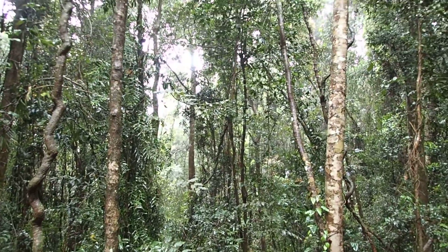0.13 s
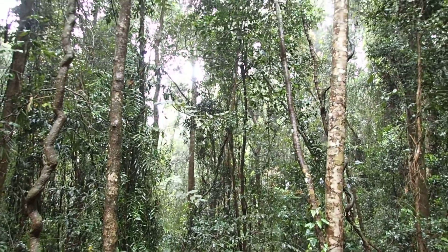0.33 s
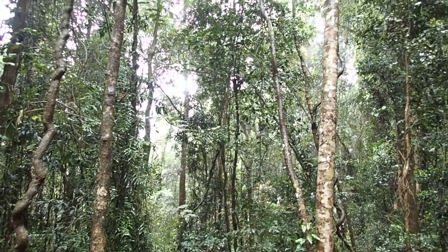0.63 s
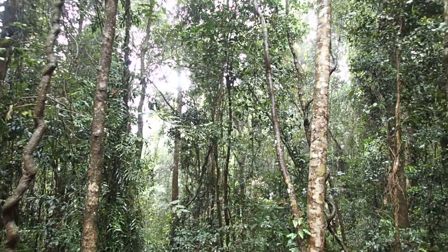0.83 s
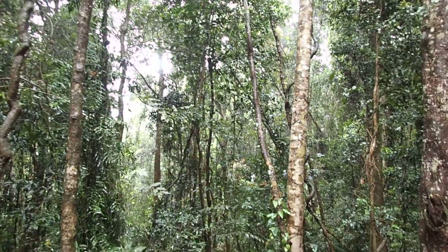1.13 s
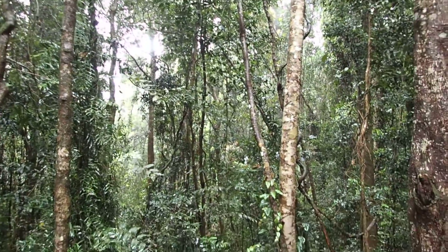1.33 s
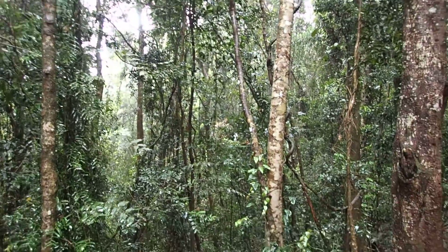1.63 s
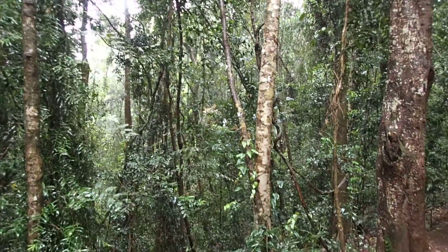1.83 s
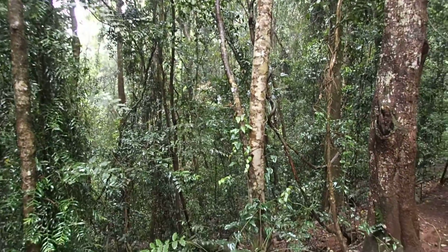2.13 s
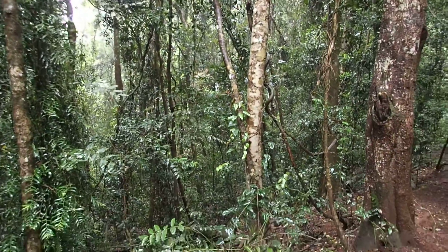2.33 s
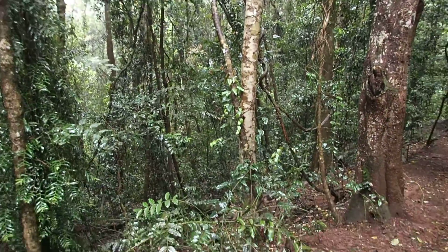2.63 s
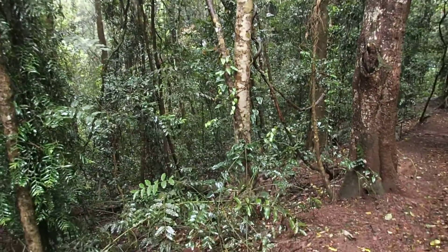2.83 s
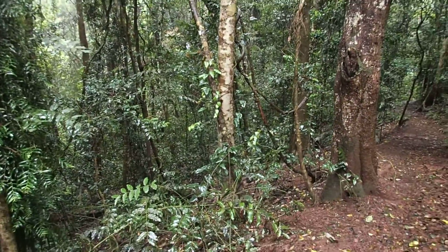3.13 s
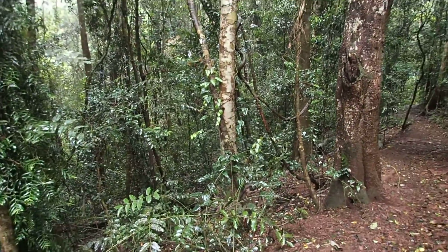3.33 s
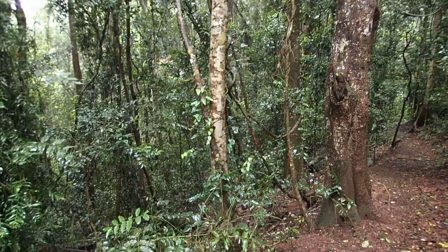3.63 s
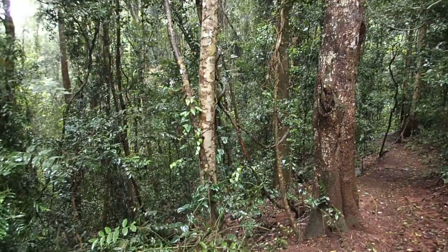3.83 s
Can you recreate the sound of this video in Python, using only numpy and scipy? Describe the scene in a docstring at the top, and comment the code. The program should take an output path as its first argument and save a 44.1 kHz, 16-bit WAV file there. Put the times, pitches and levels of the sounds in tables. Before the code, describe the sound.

A whipbird opens with a quiet, unsteady held whistle, slurs lower at 0.3 s, then whips steeply upward at about 0.6 s, loud and bright, its echo fading among trunks. Shrill cicadas drone throughout, the nearest swelling and bending four times a second, slightly left. Faint forest hush and fine litter crackle continue; twig ticks start near 1 s, a faint chirp comes at 2.3 s, a soft step at 2.8 s.

```python
"""Far cicadas drone over a faint forest hush throughout; the nearest swells and bends about four times a second.
A whipbird opens with a held whistle, slurs a lower note, then whips upward at about 0.6 s.
From about 1 s twigs and leaf litter tick over a fine crackle that runs throughout.
A faint chirp comes at 2.3 s and one soft step at 2.8 s.
Bird and near cicada are gliding tones, the rest is shaped noise; noise echoes stand for the trunks."""
import sys
import numpy as np
from scipy import signal
from scipy.fft import rfft, irfft
from scipy.io import wavfile

SR = 44100
rng = np.random.default_rng(int(sys.argv[2]) if len(sys.argv) > 2 else 0)


def to_wav(sig):
    """Store sig (one row per channel, or 1-D mono) as 16-bit WAV at the path in sys.argv[1].

    Samples outside -1..1 are clipped; the rate is SR.
    """
    pcm = np.clip(np.atleast_2d(sig), -1, 1) * 32767
    pcm = np.round(pcm).astype(np.int16)
    wavfile.write(sys.argv[1], SR, pcm.T)  # frames by channels


N = 176400

# forest hush spectrum, relative: hz, level_db_per_hz
HUSH_SPECTRUM = [(20, -5.5), (60, -0.5), (150, 1.5), (350, -4), (800, -7), (1300, -9), (1600, -9),
                 (1900, -21), (2200, -12.5), (2650, -26), (3200, -8.5), (3420, -35.5), (3620, -9),
                 (3950, -35.5), (5000, -16), (9000, -35.5)]
# even hiss spectrum, relative: hz, level_db_per_hz
HISS_SPECTRUM = [(100, -13), (9000, 1), (16000, 1.5)]
# far cicada band, relative: hz, level_db_per_hz
CHORUS_SPECTRUM = [(3900, -31.5), (4300, -26.5), (4620, -8), (4810, -24.5), (4980, 0), (5300, 1.5),
                   (5600, -4.5), (5900, -10), (6300, -14.5), (6800, -29), (7500, -27), (9200, -57)]
# thin upper fizz of the far cicadas, relative: hz, level_db_per_hz
FIZZ_SPECTRUM = [(4500, -52), (5500, 2), (6500, -3.5), (7400, 1), (8100, 1), (9200, -8.5), (11000, -11.5)]
# twig and leaf ticks: start_s, knock_db, crack_db, snap_db, snap_centre_hz
TICKS = [(0.967, -48, -54, -59, 8000), (1.009, -57, -45, -33, 7160), (1.192, -56, -44, -41.5, 6940),
         (1.203, -56, -45, -39, 5000), (1.458, -54, -41, -47, 5040), (1.489, -63, -65, -41, 7250),
         (1.949, -46, -65, -58, 8000), (2.304, -73, -54, -41, 14500), (3.275, -57, -46, -60, 8000),
         (3.317, -47.5, -44, -56, 8000), (3.323, -60, -55, -60, 8000), (3.462, -59, -50, -54, 8000),
         (3.811, -46.5, -67, -56, 8000), (3.974, -46, -47, -50, 8000)]
# swells of the nearest cicada: top_s, pitch_hz, level_db (relative)
CICADA_SWELLS = [(.01, 6060, -4), (.235, 5960, -2), (.44, 5814, -2), (.66, 5870, 3), (.88, 5860, -3.5),
                 (1.105, 5846, 0.5), (1.335, 5874, -1), (1.565, 5764, 0.5), (1.8, 5720, 0.5),
                 (2.012, 5740, -1), (2.25, 5733, -0.5), (2.472, 5706, 1.5), (2.715, 5730, 0.5),
                 (2.945, 5655, 1.5), (3.18, 5663, -0.5), (3.415, 5710, -2), (3.65, 5728, -1.5),
                 (3.88, 5626, -1)]
# course of every swell: age_s (from its top), pitch_offset_hz, level_db (relative)
SWELL_SHAPE = [(-.08, -750, -2.5), (-.052, -330, -0.5), (-.028, -39.5, 2.5), (.01, 1, -1),
               (.044, -40.5, -4.5), (.07, -250, 0.5), (.092, -720, -0.5), (.13, -900, -8)]
# held whistle: time_s, level_db
WHISTLE_LEVEL = [(0, -60), (.035, -61), (0.061, -44.5), (.076, -72), (.09, -45.5), (.105, -62), (.12, -47),
                 (.15, -75), (.185, -43.5), (0.219, -40.5), (.24, -50.5), (.29, -48), (0.311, -70)]
# slurred low note: time_s, pitch_hz, level_db
SLUR_GLIDE = [(.31, 2036, -70), (.33, 1772, -52), (.35, 1621, -55.5), (.38, 1513, -48), (.41, 1515, -45.5),
              (.465, 1464, -54.5), (.495, 1470, -70), (.53, 1590, -75), (.562, 1720, -64)]
# upward whip: time_s, pitch_hz, level_db
WHIP_GLIDE = [(.558, 1729, -59), (.572, 1775, -46.5), (.587, 1785, -49), (.598, 2260, -42.5),
              (.613, 3100, -33), (.627, 3900, -40), (.637, 4660, -27), (.644, 5200, -20),
              (.654, 6100, -26.5), (.665, 6950, -27.5), (.677, 7360, -32), (.693, 7400, -45)]

HUSH_DB, HUSH_SIDE_DB, HUSH_PAN_DB = -57, -5.5, 0.5
HUSH_WANDER_DB, HUSH_WANDER_HZ = 1.72, 1.33
HISS_DB, HISS_SIDE_DB, HISS_PAN_DB = -66, 0, 0.91
CHORUS_DB, CHORUS_SIDE_DB, CHORUS_PAN_DB = -45, -13, 2.5
CHORUS_FLICKER_DB, CHORUS_FLICKER_HZ = 1.82, 17
FIZZ_DB, FIZZ_SIDE_DB, FIZZ_PAN_DB = -58, -1.5, 1.6
CHIRP_S, CHIRP_WIDTH_S, CHIRP_HZ, CHIRP_DB = 2.27, 0.078, (2920, 3660), -62
KNOCK_HZ, CRACK_HZ, SNAP_SPREAD_RATIO = (445, 1570), (1700, 3740), 1.25
KNOCK_DECAY_S, CRACK_DECAY_S, SNAP_DECAY_S = 0.0081, 0.0012, 0.0014
STEP_S, STEP_HZ, STEP_DECAY_S, STEP_DB = 2.849, (220, 430), .012, -46.5
LITTER_PER_S, LITTER_DECAY_S, LITTER_HZ, LITTER_DB = 30, 0.0088, (400, 3000), -69
TICK_WET_DB, TICK_SIDE_DB, TICK_PAN_DB = -10, -11, 1.5
CICADA_BASE_DB, CICADA_WET_DB, CICADA_SIDE_DB, CICADA_PAN_DB = -45.5, 0.5, -7.5, 2.5
CICADA_JITTER_RATIO, CICADA_JITTER_HZ = 0.0157, 498
CICADA_FLUTTER_DB, CICADA_FLUTTER_HZ = 2.5, 28
RASP_AFTER_S, RASP_S, RASP_FROM_HZ, RASP_TO_HZ = .025, .07, 7300, 5840
RASP_JITTER_RATIO, RASP_JITTER_HZ, RASP_BASE_DB = .05, 747, -58
WHISTLE_CENTRE_HZ, OVERTONE_DB, BIRD_PAN_DB = 2294, -40.5, 2
BIRD_WAVER_RATIO, BIRD_WAVER_HZ = 0.0057, 75
WHISTLE_WET_DB, SLUR_WET_DB, WHIP_WET_DB = -4.5, -9, -1.5
LEAVES_DB, LEAVES_DECAY_S = -3.5, 0.0028
EARLY_DECAY_S, EARLY_DB, FOREST_T60_S, FOREST_DELAY_S = 0.045, -2, 0.95, 0.0043
TOP_HZ = 15720


def undb(db):
    """Decibels to amplitude gain."""
    return 10 ** (np.asarray(db) / 20)


def unit(x):
    """Scale to rms 1."""
    return x / np.sqrt(np.mean(x ** 2))


def pan(x, left_db):
    """Make the left channel left_db louder than the right."""
    return x * undb(np.array([[left_db], [-left_db]]) / 2)


def mid_side(mid, side, side_db):
    """Left and right from a common part and an opposed part."""
    return mid + undb(side_db) * side * np.array([[1], [-1]])


def walk(rate_hz):
    """Random drift of rms 1: white noise low-passed around rate_hz."""
    hz = np.fft.rfftfreq(N, 1 / SR)
    spectrum = rfft(rng.standard_normal(N)) / (1 + (hz / rate_hz) ** 4)
    return unit(irfft(spectrum, N))


def noise(points, side_db):
    """Stereo noise of a given spectrum, its mid part at rms 1."""
    point_hz, point_db = np.array(points, float).T
    hz = np.fft.rfftfreq(N, 1 / SR)
    gain = undb(np.interp(np.log(hz + 1), np.log(point_hz), point_db))
    mid, side = irfft(rfft(rng.standard_normal((2, N))) * gain, N)
    return mid_side(unit(mid), unit(side), side_db)


def band(edges_hz):
    """Band-passed noise of rms 1."""
    edges_hz = np.clip(edges_hz, 1, SR / 2 - 1)
    sos = signal.butter(2, edges_hz, "band", fs=SR, output="sos")
    return unit(signal.sosfilt(sos, rng.standard_normal(N)))


def turn(hz):
    """Phase in radians of a gliding tone."""
    return 2 * np.pi * np.cumsum(hz) / SR


def gate(t, start_s, end_s, ramp_s):
    """1 between start and end, with linear ramps inside."""
    return np.clip(np.minimum(t - start_s, end_s - t) / ramp_s, 0, 1)


def decay(t, start_s, decay_s):
    """Sudden onset, then exponential decay."""
    return (t >= start_s) * np.exp(-np.minimum(np.abs(t - start_s) / decay_s, 20))


def forest(x, wet_db, side_db):
    """Direct sound plus noise echoes: quick scatter from near trunks, long tail from far ones."""
    t = np.arange(SR) / SR
    onset = np.clip(t / FOREST_DELAY_S - .5, 0, 1)
    early = onset * np.exp(-t / EARLY_DECAY_S)
    tail = onset * undb(-60 * t / FOREST_T60_S)
    shape = np.hypot(undb(EARLY_DB) * unit(early), unit(tail)) / np.sqrt(SR)
    mid, side = rng.standard_normal((2, SR)) * shape
    response = mid_side(mid, side, side_db)
    return x + undb(wet_db) * signal.fftconvolve(x[None], response, axes=1)[:, :N]


def hush():
    """Distant canopy air as slowly wandering noise, under a thin even hiss."""
    level_db = HUSH_DB + HUSH_WANDER_DB * walk(HUSH_WANDER_HZ)
    air = noise(HUSH_SPECTRUM, HUSH_SIDE_DB) * undb(level_db)
    hiss = noise(HISS_SPECTRUM, HISS_SIDE_DB) * undb(HISS_DB)
    return pan(air, HUSH_PAN_DB) + pan(hiss, HISS_PAN_DB)


def chorus():
    """Many far cicadas merged into one flickering noise band, with a wide steady fizz above."""
    level_db = CHORUS_DB + CHORUS_FLICKER_DB * walk(CHORUS_FLICKER_HZ)
    drone = noise(CHORUS_SPECTRUM, CHORUS_SIDE_DB) * undb(level_db)
    fizz = noise(FIZZ_SPECTRUM, FIZZ_SIDE_DB) * undb(FIZZ_DB)
    return pan(drone, CHORUS_PAN_DB) + pan(fizz, FIZZ_PAN_DB)


def far_chirp(t):
    """Faint chirp: one narrow noise band under a bell-shaped envelope."""
    envelope = np.exp(-((t - CHIRP_S) / CHIRP_WIDTH_S) ** 2)
    return undb(CHIRP_DB) * envelope * band(CHIRP_HZ)


def litter_crackle():
    """Random grains of random size, each a short decaying noise burst."""
    grains = (rng.random(N) < LITTER_PER_S / SR) * rng.random(N)
    envelope = signal.lfilter([1], [1, -np.exp(-1 / (LITTER_DECAY_S * SR))], grains)
    return undb(LITTER_DB) * unit(envelope * band(LITTER_HZ))


def footfalls(t):
    """Decaying noise bursts: twig ticks of knock, crack and snap, and one low step on the soil."""
    out = undb(STEP_DB) * decay(t, STEP_S, STEP_DECAY_S) * band(STEP_HZ)
    knock, crack = band(KNOCK_HZ), band(CRACK_HZ)
    for start_s, knock_db, crack_db, snap_db, snap_hz in TICKS:
        snap = band([snap_hz / SNAP_SPREAD_RATIO, snap_hz * SNAP_SPREAD_RATIO])
        out += undb(knock_db) * decay(t, start_s, KNOCK_DECAY_S) * knock
        out += undb(crack_db) * decay(t, start_s, CRACK_DECAY_S) * crack
        out += undb(snap_db) * decay(t, start_s, SNAP_DECAY_S) * snap
    out += litter_crackle()
    return pan(forest(out, TICK_WET_DB, TICK_SIDE_DB), TICK_PAN_DB)


def cicada(t):
    """Rough fluttering tone that climbs and drops in each swell, with a falling rasp after the top."""
    out = np.zeros(N)
    tone_jitter = 1 + CICADA_JITTER_RATIO * walk(CICADA_JITTER_HZ)
    rasp_jitter = 1 + RASP_JITTER_RATIO * walk(RASP_JITTER_HZ)
    flutter_db = CICADA_FLUTTER_DB * walk(CICADA_FLUTTER_HZ)
    ages_s, bend_hz, shape_db = np.array(SWELL_SHAPE).T
    for top_s, pitch_hz, swell_db in CICADA_SWELLS:
        near = np.abs(t - top_s) < .25
        age_s = t[near] - top_s

        tone_db = CICADA_BASE_DB + np.interp(age_s, ages_s, shape_db) + flutter_db[near]
        tone_gain = undb(tone_db) * gate(age_s, ages_s[0], ages_s[-1], .008)
        tone_hz = pitch_hz + np.interp(age_s, ages_s, bend_hz)
        tone = tone_gain * np.sin(turn(tone_hz * tone_jitter[near]))

        rasp_age_s = age_s - RASP_AFTER_S
        rasp_hz = np.interp(rasp_age_s, [0, RASP_S], [RASP_FROM_HZ, RASP_TO_HZ])
        rasp_gain = undb(RASP_BASE_DB) * gate(rasp_age_s, 0, RASP_S, 0.013)
        rasp = rasp_gain * np.sin(turn(rasp_hz * rasp_jitter[near]))

        out[near] += np.sqrt(2) * undb(swell_db) * (tone + rasp)
    return pan(forest(out, CICADA_WET_DB, CICADA_SIDE_DB), CICADA_PAN_DB)


def bird_note(t, times_s, pitch_hz, level_db):
    """Nearly pure wavering tone with a faint second harmonic."""
    phase = turn(pitch_hz * (1 + BIRD_WAVER_RATIO * walk(BIRD_WAVER_HZ)))
    gain = undb(np.interp(t, times_s, level_db)) * gate(t, times_s[0], times_s[-1], 0.0026)
    return np.sqrt(2) * gain * (np.sin(phase) + undb(OVERTONE_DB) * np.sin(2 * phase))


def bird_glide(t, table):
    """Bird note whose pitch follows a table."""
    times_s, pitch_hz, level_db = np.array(table).T
    return bird_note(t, times_s, np.interp(t, times_s, pitch_hz), level_db)


def leaf_scatter(t, x):
    """Nearby leaves roughen a sound: convolution with a very short noise decay."""
    leaves = unit(rng.standard_normal(N) * np.exp(-t / LEAVES_DECAY_S)) / np.sqrt(N)
    scattered = signal.fftconvolve(x, leaves)[:N]
    return (x + undb(LEAVES_DB) * scattered) / np.hypot(1, undb(LEAVES_DB))


def whipbird(t):
    """Whistle, slur and whip in a row, each echoing among the trees to its own degree."""
    times_s, level_db = np.array(WHISTLE_LEVEL).T
    whistle = bird_note(t, times_s, WHISTLE_CENTRE_HZ, level_db)
    slur = bird_glide(t, SLUR_GLIDE)
    whip = leaf_scatter(t, bird_glide(t, WHIP_GLIDE))
    song = forest(whistle, WHISTLE_WET_DB, side_db=-35)
    song += forest(slur, SLUR_WET_DB, side_db=-20)
    song += forest(whip, WHIP_WET_DB, side_db=-13)
    return pan(song, BIRD_PAN_DB)


def scene():
    """Sum of all layers, background first."""
    t = np.arange(N) / SR
    return hush() + chorus() + far_chirp(t) + footfalls(t) + cicada(t) + whipbird(t)


def record(dry):
    """Steep elliptic low-pass at TOP_HZ."""
    sos = signal.ellip(14, .1, 70, TOP_HZ, fs=SR, output="sos")
    return signal.sosfilt(sos, dry)


dry = scene()
out = record(dry)
to_wav(out)
```